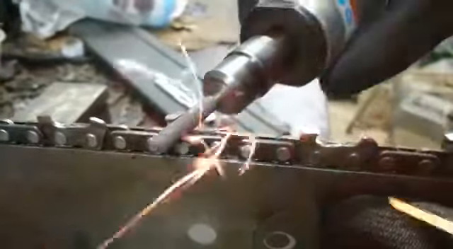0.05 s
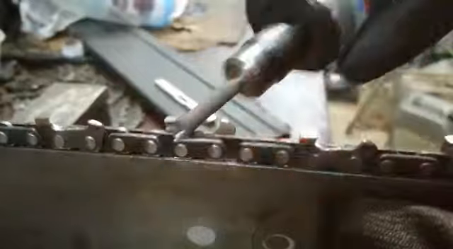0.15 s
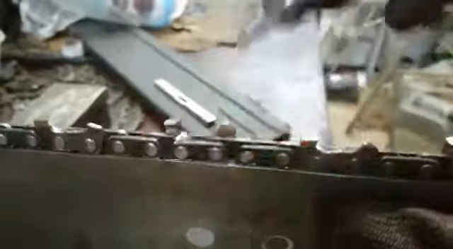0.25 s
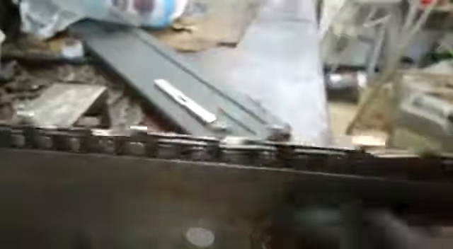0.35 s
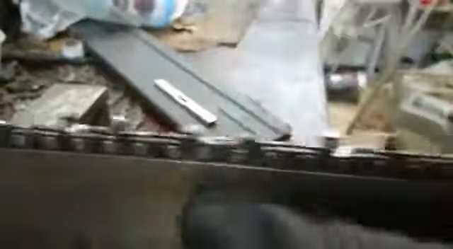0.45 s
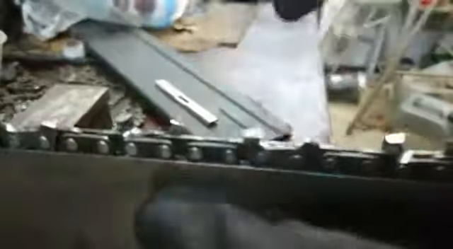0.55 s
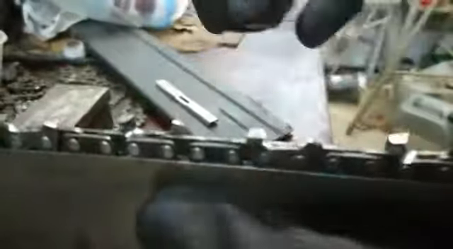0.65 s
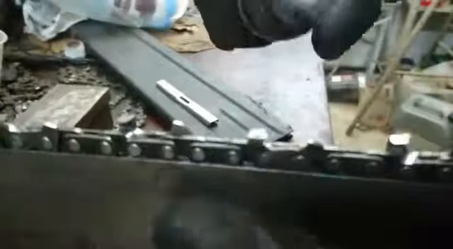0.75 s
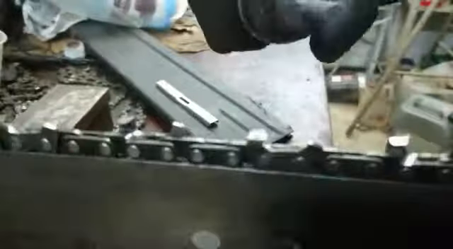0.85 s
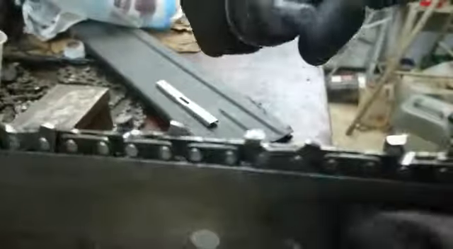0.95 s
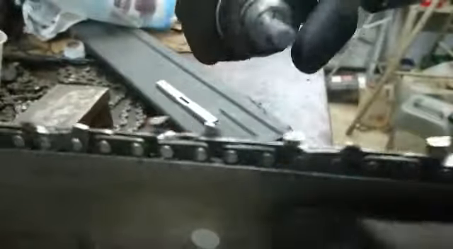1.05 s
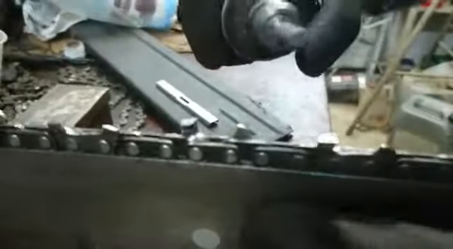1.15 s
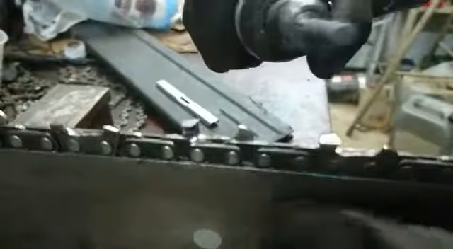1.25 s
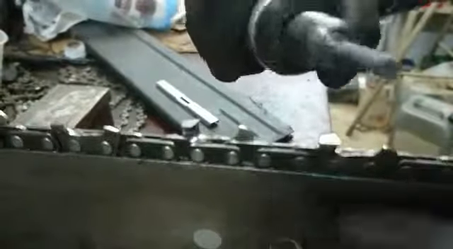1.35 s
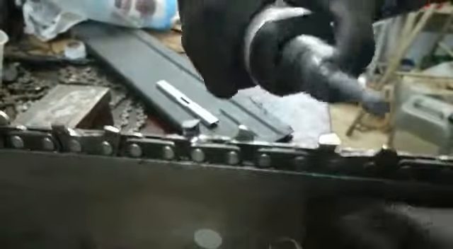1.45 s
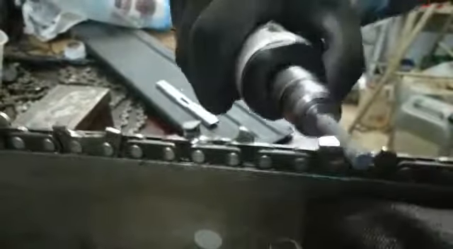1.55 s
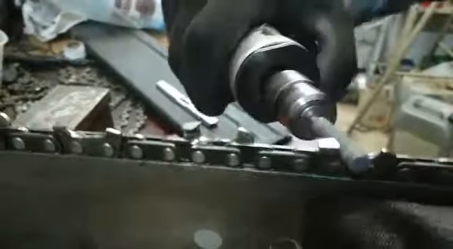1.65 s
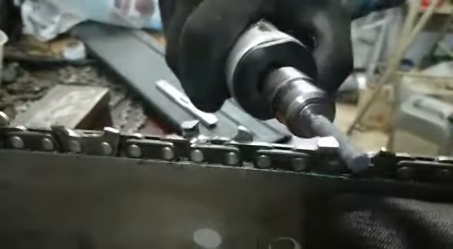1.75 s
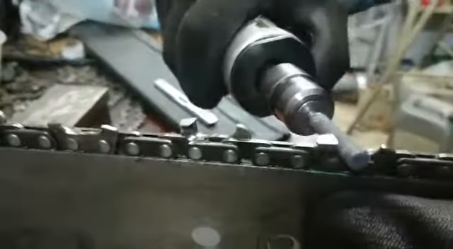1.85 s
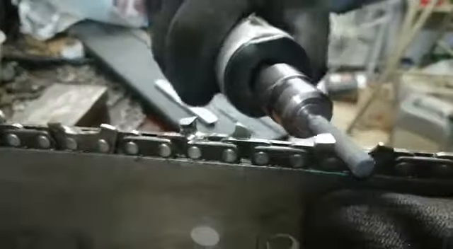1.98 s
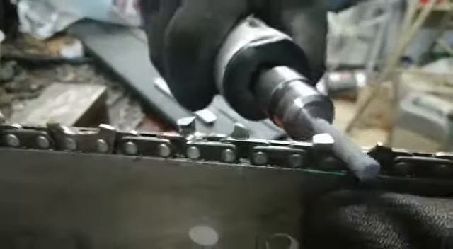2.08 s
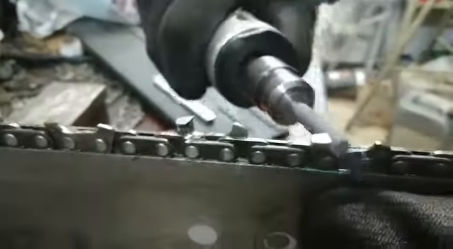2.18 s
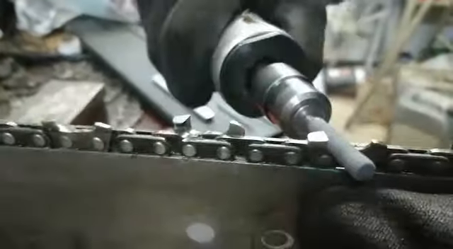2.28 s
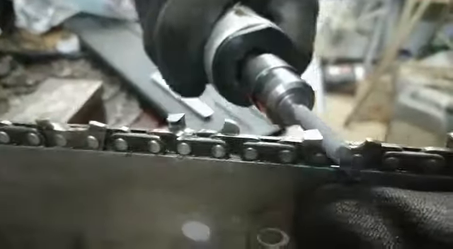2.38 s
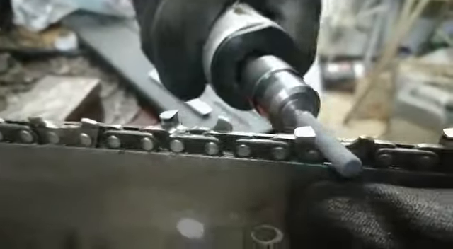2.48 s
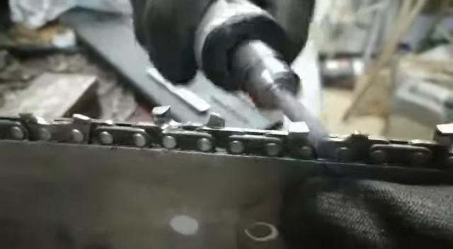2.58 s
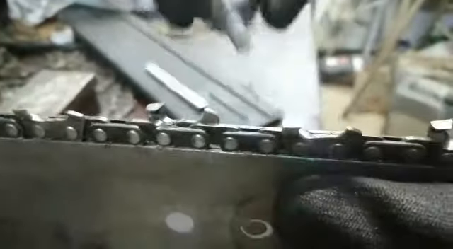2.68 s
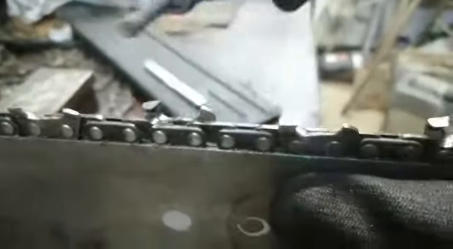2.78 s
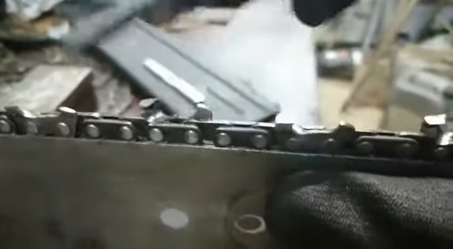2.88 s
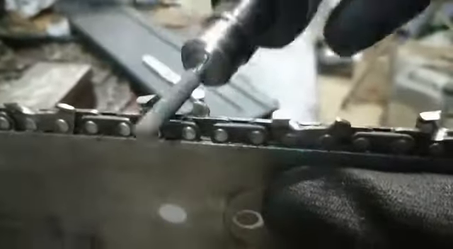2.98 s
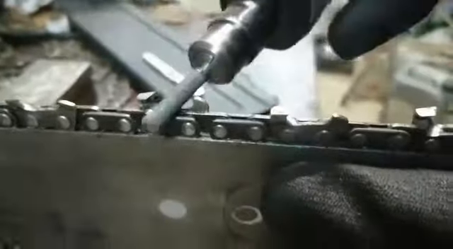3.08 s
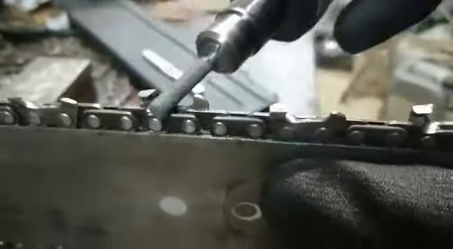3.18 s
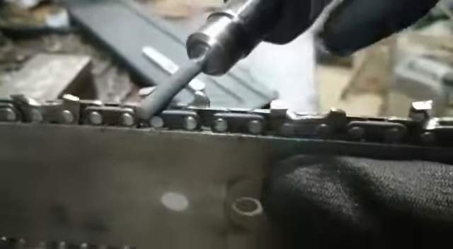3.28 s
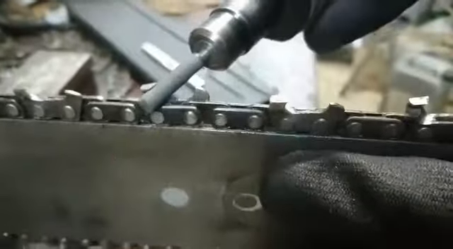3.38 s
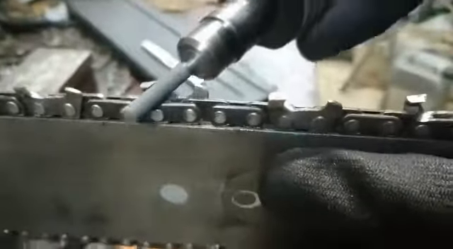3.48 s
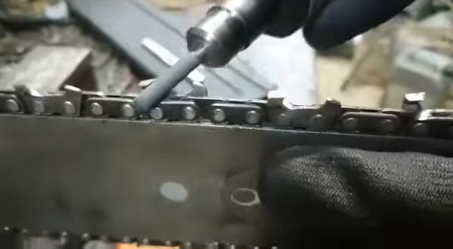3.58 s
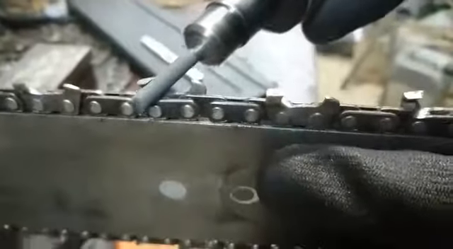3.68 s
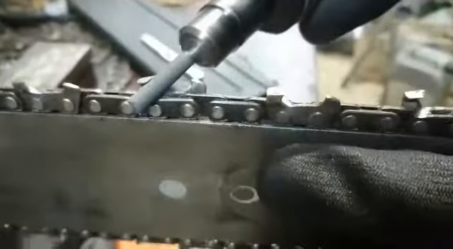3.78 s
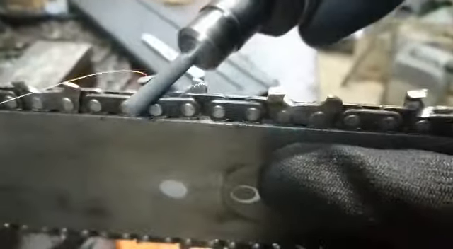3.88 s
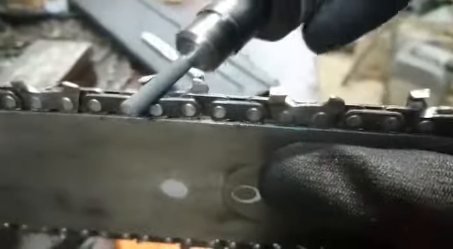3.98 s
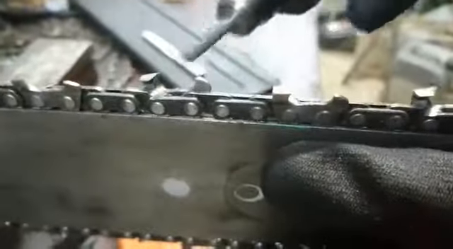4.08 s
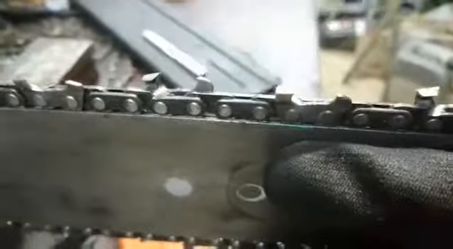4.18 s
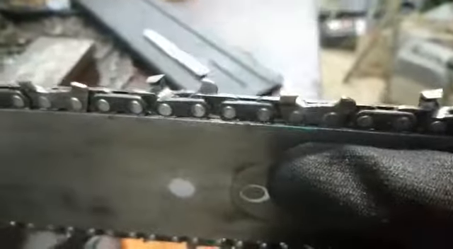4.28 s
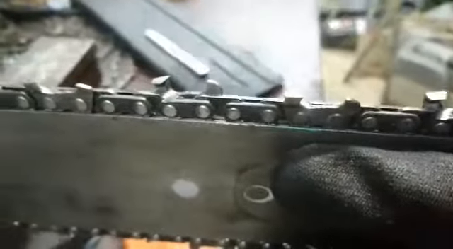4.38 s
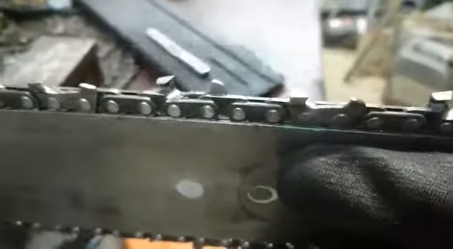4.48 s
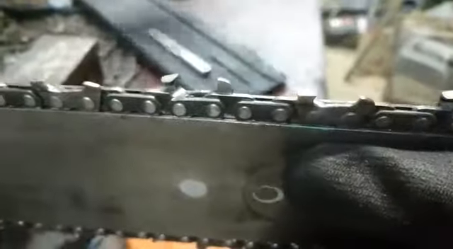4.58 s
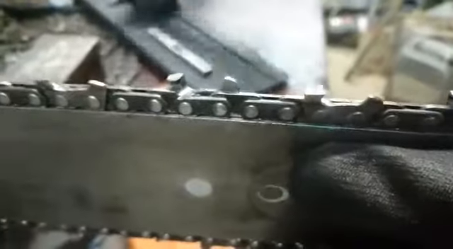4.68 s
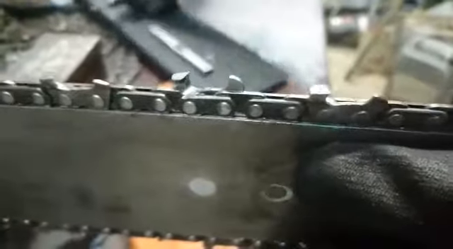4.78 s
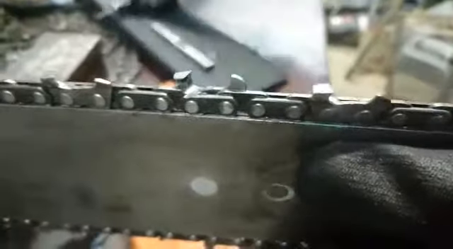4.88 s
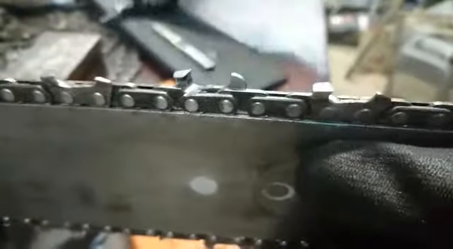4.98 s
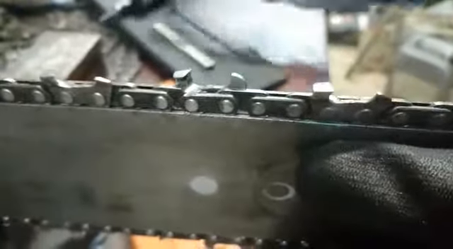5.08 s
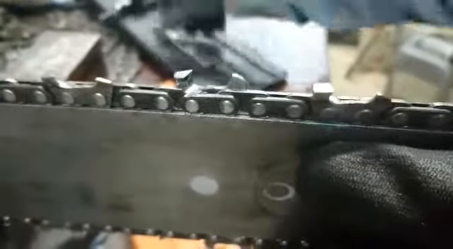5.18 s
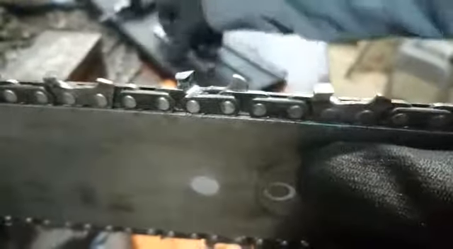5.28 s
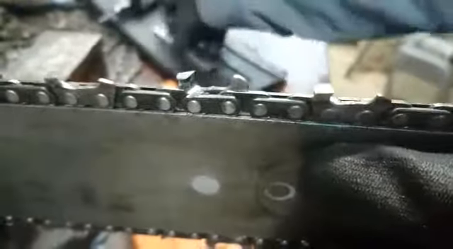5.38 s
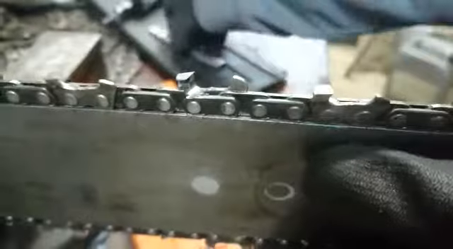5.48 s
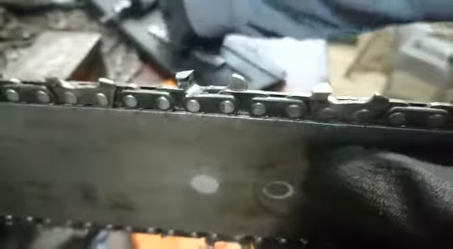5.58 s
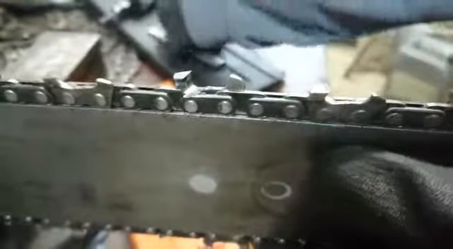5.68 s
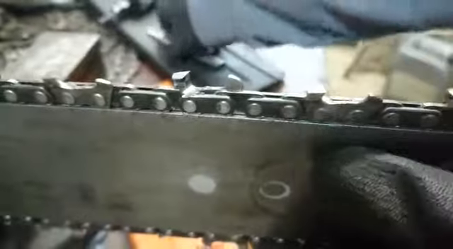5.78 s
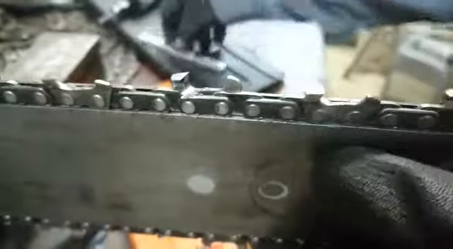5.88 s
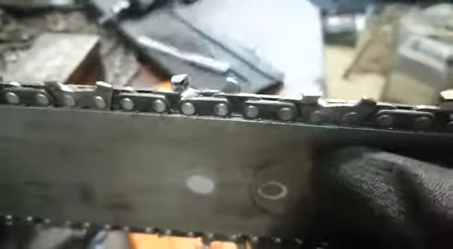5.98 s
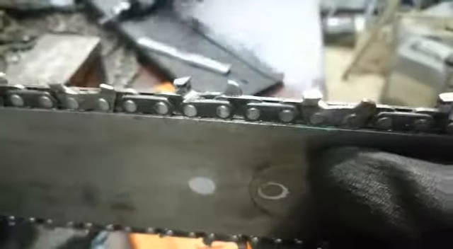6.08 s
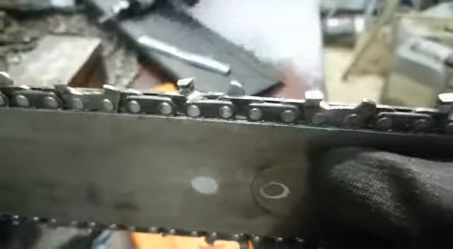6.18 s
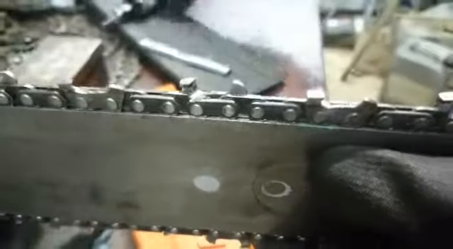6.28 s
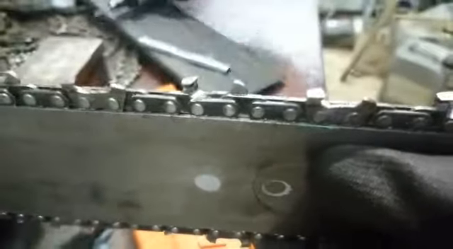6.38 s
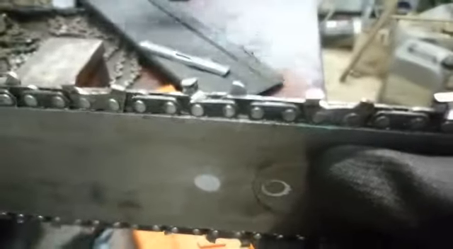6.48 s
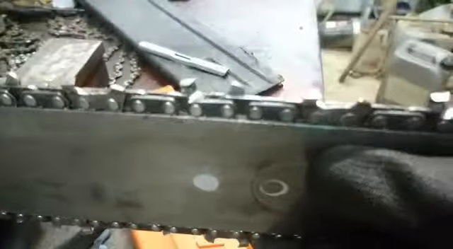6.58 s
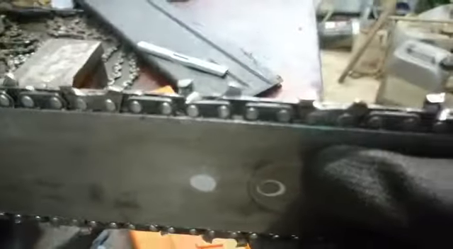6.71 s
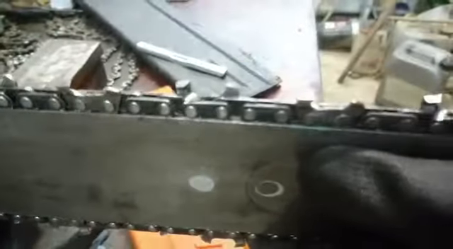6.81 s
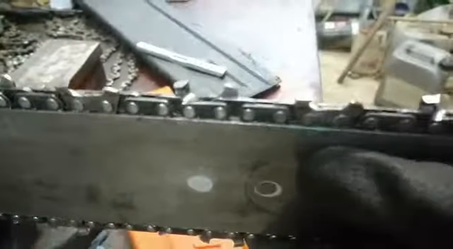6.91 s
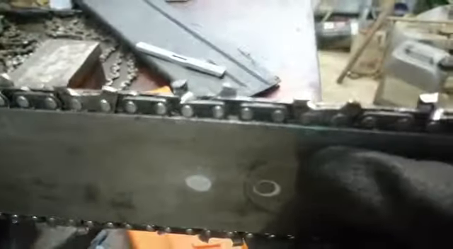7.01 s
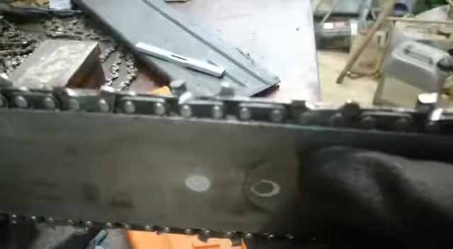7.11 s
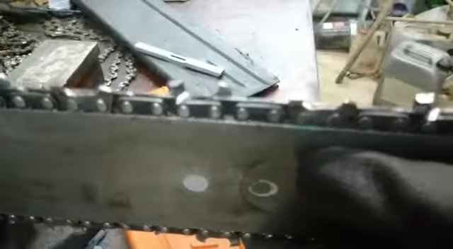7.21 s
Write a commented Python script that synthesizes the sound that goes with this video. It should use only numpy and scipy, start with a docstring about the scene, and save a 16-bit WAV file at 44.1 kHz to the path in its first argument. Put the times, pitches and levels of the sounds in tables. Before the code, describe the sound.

In a hard-walled workshop with low room tone and faint hum, a close air grinder is already running, a shrill whine near 4.4 kHz with harsh hiss and gritty grinding. It shuts at about 0.25 s, its pitch falling rapidly to silence. Chain glides softly along its bar around 0.35 and 0.95-1.5 s, with clicks near 1.3 and 1.6 s and a dull tool knock. At 1.9 s air pops, the rotor whoops up and whines, sagging slightly, until 2.7 s. Light chain clicks and a short slide follow at 3.1-3.3 s. A third, rougher grinding burst runs 3.3-4.1 s. The tool clacks down hollowly at 4.4 and 4.6 s; a tiny steel chink follows at 4.7 s. Woody knocks, dull drags and faint cloth rustle continue, then brighter steel scraping and clatter from 6.6 to 7 s. Exhaust air blows mostly against the left microphone.

```python
"""A vane-motor air grinder works on a saw chain clamped in a workshop vise; its first pull is already running.
It coasts to a stop, the chain slides and clicks along its bar, a tool knocks, and a second pull whoops up and whines.
The chain moves again before a third pull; then the tool is laid down, steel chinks, and things knock, drag and clatter.
The grinder sums harmonics of its turning rotor with shaped air noise that blows mostly across the left microphone port.
Bench and chain sounds are noise bursts and resonances; a diffuse room surrounds them over low room tone and hum."""
import sys
import numpy as np
from scipy import signal
from scipy.fft import rfft, irfft, next_fast_len
from scipy.io import wavfile
from scipy.ndimage import uniform_filter1d

SR = 44100
rng = np.random.default_rng(int(sys.argv[2]) if len(sys.argv) > 2 else 0)


def store_pcm(level_fs):
    """Save levels as 16-bit WAV."""
    pcm = np.round(np.clip(level_fs, -1, 1) * 32767).astype(np.int16)
    wavfile.write(sys.argv[1], SR, np.atleast_2d(pcm).T)


N = 319725
TIME = np.arange(N) / SR
CUTOFF_HZ = 16000


def from_db(db):
    """Decibels to gain."""
    return 10 ** (np.asarray(db) / 20)


def rms_one(x):
    """Scale to unit power."""
    return x / np.sqrt(np.mean(x ** 2) + 1e-20)


def at_hz(points, hz):
    """Read each column of a spectrum on a log-frequency axis."""
    known, *columns = np.transpose(points)
    log_hz = np.log(np.maximum(hz, 1))
    return np.array([np.interp(log_hz, np.log(known), column) for column in columns])


def drift(rate, size):
    """Random wandering with a spread near 1, through `rate` random points per second."""
    knots = rng.standard_normal(4096)
    return np.interp(np.arange(size) * rate / SR, np.arange(len(knots)), knots)


def coloured(x, spectrum):
    """Give stereo noise a spectrum; rms 1."""
    size = next_fast_len(N)
    bins_hz = np.arange(size // 2 + 1) * SR / size
    shaped = rfft(x, size) * from_db(at_hz(spectrum, bins_hz))
    return rms_one(irfft(shaped, size)[:, :N])


def noise(spectrum, grain_db=0):
    """Stereo noise, gritty when its grains differ in size."""
    grains = from_db(grain_db * np.minimum(rng.exponential(1, N), 6))
    return coloured(rng.standard_normal((2, N)) * grains, spectrum)


def band(x, low_hz, high_hz):
    """Causal band-pass."""
    sos = signal.butter(2, [low_hz, min(high_hz, SR / 2 - 100)], "band", fs=SR, output="sos")
    return signal.sosfilt(sos, x + 1e-18)


def resonate(x, hz, width_hz):
    """One two-pole resonance, with unit gain near its peak."""
    r = np.exp(-np.pi * width_hz / SR)
    peak = np.array([1, 0, -1]) * (1 - r * r) / 2
    return signal.lfilter(peak, [1, -2 * r * np.cos(2 * np.pi * hz / SR), r * r], x)


def resonances(modes, force, apart_hz=1800):
    """Noise of a given force shakes a body's modes; the two ports hear the low ones alike, the high ones apart."""
    shake, out = rng.standard_normal((3, len(force))) * force + 1e-18, 0
    for hz, db, width_hz in modes:
        apart = hz / apart_hz
        drive = (shake[0] + apart * shake[1:]) / np.hypot(1, apart)
        out = out + from_db(db) * resonate(drive, hz, width_hz)
    return band(out, modes[0][0] / 3, modes[-1][0] * .87)


def blow(rattle_t60, crack_db=7, crack_t60=0.014, crunch_db=4):
    """Force of one contact: a dry crack that trails into a crunchy rattle (t60 in s)."""
    t = TIME[:SR // 4]
    crack = from_db(crack_db - 60 * t / crack_t60)
    return crack + from_db(crunch_db * drift(300, len(t)) - 60 * t / rattle_t60)


def at_level(x, db):
    """Set the level of a hit by its first 20 ms."""
    return from_db(db) * x / np.std(x[:, :SR // 50])


def add(out, s, sound):
    """Mix a short sound in at a given time."""
    start = int(s * SR)
    out[:, start:start + sound.shape[-1]] += sound[..., :N - start]


# Air of the still workshop. Each row: frequency in Hz, relative density in dB per Hz.
SHOP_AIR = [(25, -22), (55, 1), (120, 4.5), (300, -5), (600, -6), (1200, -15), (3000, -21.5), (8000, -29),
            (15000, -38)]
# Steady hum lines. Each row: frequency in Hz, level in dB before the final left/right trim.
HUM_LINES = [(59.2, -64), (301.5, -68.5)]


def background(shop_db=-61, apart=0.26):
    """Low room tone, much alike at both ports, with a faint hum of steady sines."""
    shared = rng.standard_normal(N)
    air = coloured(shared + apart * rng.standard_normal((2, N)), SHOP_AIR)
    hum = sum(np.sqrt(2) * from_db(db) * np.sin(2 * np.pi * hz * TIME) for hz, db in HUM_LINES)
    return from_db(shop_db) * air + hum


# How long the room rings. Each row: frequency in Hz, decay time to -60 dB in s.
ROOM_DECAY = [(100, 1), (400, 0.55), (900, 0.55), (2200, 0.65), (4500, 0.71), (8000, 0.36), (14000, .33)]
# How strongly the room answers. Each row: frequency in Hz, relative level in dB for the band around it.
ROOM_STRENGTH = [(100, -10), (450, -7), (850, -1.5), (1250, -6), (1900, -2.5), (2600, -7.5), (3400, -5),
                 (4500, -17), (8000, -11), (14000, -17)]


def workshop(x, gap_s=0.002, build_s=0.018):
    """Diffuse echo of a hard-walled room: noise bands that build up, then die each at its own pace."""
    t, tail = TIME[:SR], 0
    edges = np.geomspace(70, 17000, 15)
    swell = np.clip((t - gap_s) / build_s, 0, 1)
    for low, high in zip(edges, edges[1:]):
        hz = np.sqrt(low * high)
        decay = swell * from_db(-60 * t / at_hz(ROOM_DECAY, hz))
        ring = band(rng.standard_normal((2, SR)), low, high) * decay / np.linalg.norm(decay)
        tail = tail + ring * from_db(at_hz(ROOM_STRENGTH, hz))
    mono = x.sum(axis=0, keepdims=True) / np.sqrt(2)
    return signal.fftconvolve(mono, tail, axes=1)[:, :N]


def wall_echo(x, delay_s=.0155, echo_db=-14):
    """A near wall throws the midrange back, doubling and blurring the glides."""
    back = band(x.mean(axis=0), 550, 2400)
    return from_db(echo_db) * np.interp(TIME - delay_s, TIME, back, left=0)


RUSTLE_FROM_S, RUSTLE_TO_S, RUSTLE_DB = 5.3, 6.7, -63.5   # gloves and sleeve move while the bench is tidied
# Cloth colour. Each row: frequency in Hz, relative density in dB per Hz.
CLOTH = [(300, 0), (900, 5.5), (2000, -0.5), (4500, 1.5), (7000, -9.5), (12500, -10.5), (16000, -10)]


def rustle(flutter_db=3.5):
    """Faint gritty cloth noise whose level wanders while the arm moves."""
    moving = np.clip(10 * np.minimum(TIME - RUSTLE_FROM_S, RUSTLE_TO_S - TIME), 0, 1)
    return moving * from_db(RUSTLE_DB + flutter_db * drift(14, N)) * noise(CLOTH, grain_db=3.0)


# Strongest resonances of the bench. Each row: frequency in Hz, relative level in dB, width in Hz.
BENCH_MODES = [(330, -3, 330), (650, -1, 130), (910, -1, 200), (1400, -13, 250), (1620, -10, 120)]
# Resonances of a dragged steel piece. Each row: frequency in Hz, relative level in dB, width in Hz.
STEEL_MODES = [(560, -8, 400), (950, -5, 260), (1280, 0, 380), (1750, -3.5, 600), (2300, -7, 500),
               (2750, -8, 250), (3750, -3, 280), (4550, -8, 650), (6400, -14, 1200)]
# Things dragged over the bench. Each row: start in seconds, length in seconds,
# dull rub in dB, bright scrape in dB (levels at full pressure, before the mix).
DRAG_MOVES = [(4.717, .11, -42, -66), (4.86, .22, -40, -74), (5.469, 0.087, -49, -62),
              (5.83, 0.19, -47.5, -54), (6.29, 0.08, -56, -55), (6.42, .12, -54, -70),
              (6.645, .38, -47, -39.5)]
DRAG_PEAK = 0.38   # share of a drag at which it presses hardest
GRAINS_PER_S, GRAIN_S = 220, .003   # small catches, and the time constant at which each dies


def drags(size_db=3.0, smooth=1.0, glint_db=-24):
    """Gritty sliding: small catches shake bench top and steel under a pressure that swells and eases off."""
    sizes = from_db(size_db * np.minimum(rng.exponential(1, N), 3))
    catches = (rng.random(N) < GRAINS_PER_S / SR) * sizes
    grit = smooth + signal.lfilter([1], [1, -np.exp(-1 / (GRAIN_S * SR))], catches + 1e-18)
    rub = rms_one(band(resonances(BENCH_MODES, grit), 70, 1100))
    scrape = rms_one(resonances(STEEL_MODES, grit))
    glint = rms_one(band(rng.standard_normal((2, N)) * grit, 11500, 14000))
    scrape = scrape + from_db(glint_db) * glint
    out = np.zeros((2, N))
    for s, length, rub_db, scrape_db in DRAG_MOVES:
        angle = np.interp(TIME, [s, s + DRAG_PEAK * length, s + length], [0, np.pi / 2, np.pi])
        out += np.sin(angle) * (from_db(rub_db) * rub + from_db(scrape_db) * scrape)
    return out


# Hard contacts of the dragged steel. Each row: start in seconds, level in dB before the mix.
CLATTER_HITS = [(6.608, -56), (6.6545, -42.5), (6.7185, -38), (6.7738, -35.5), (6.788, -39), (6.8268, -40),
                (6.8948, -40), (6.9637, -49)]


def clatter(rattle_t60=.05, hard_hz=1300):
    """Hard little contacts bring out the upper resonances of the dragged steel."""
    out = np.zeros((2, N))
    for s, db in CLATTER_HITS:
        force = blow(rattle_t60, crack_db=9, crack_t60=.009)
        add(out, s, at_level(band(resonances(STEEL_MODES, force), hard_hz, CUTOFF_HZ), db))
    return out


# Tools knocked on the bench. Each row: start in seconds, thud in dB, ringing body in dB, click in dB
# (levels before the mix), rattle decay to -60 dB in seconds.
BENCH_KNOCKS = [(1.603, -48, -58, -76, .15), (4.7328, -40, -40, -62, .13), (4.869, -40, -40, -76, .08),
                (4.9024, -42, -37, -53, .06), (4.938, -44, -42, -60, .06), (4.9982, -46, -38, -61, .06),
                (5.2377, -35, -35.5, -43, .18), (5.3922, -52, -41.5, -53, .06), (5.484, -49, -41, -57, .16),
                (5.8886, -54, -43, -58, .15), (6.4682, -54, -51, -72, .08)]


def knocks(thud_t60=0.09):
    """Each knock on the bench is a thud of its top, its woody resonances and a dry click."""
    out, t = np.zeros((2, N)), TIME[:SR // 4]
    for s, thud_db, body_db, click_db, rattle_t60 in BENCH_KNOCKS:
        force = blow(rattle_t60)
        thud = band(rng.standard_normal((1, len(t))) * from_db(-60 * t / thud_t60), 125, 300)
        click = band(band(rng.standard_normal((2, len(t))) * force, 1300, 4900), 800, 6200)
        body = at_level(resonances(BENCH_MODES, force), body_db)
        add(out, s, at_level(thud, thud_db) + body + at_level(click, click_db))
    return out


CHINK_S = 4.7006   # when a small steel part is touched


def chink(tick_db=-13, ping_db=0, ping_hz=12150, t60=0.009, bounce_s=.0042, bounce_db=-7):
    """Steel touches steel and bounces once: a sharp tick and a very brief high ping, both of noise."""
    out, t = np.zeros((2, N)), TIME[:SR // 20]
    for s, db in ((CHINK_S, 0), (CHINK_S + bounce_s, bounce_db)):
        tick, ping = rng.standard_normal((2, 2, len(t))) * from_db(db - 60 * t / t60)
        tick = from_db(tick_db) * band(tick, 2500, 15000)
        add(out, s, tick + from_db(ping_db) * band(ping, ping_hz - 600, ping_hz + 600))
    return out


# The grinder meets the bench. Each row: start in seconds, level in dB before the mix.
TOUCHDOWNS = [(4.3954, -32.5), (4.4185, -37), (4.572, -28.5)]
# Resonances of its casing on the bench. Each row: frequency in Hz, relative level in dB, width in Hz.
CASING_MODES = [(520, -1, 100), (960, 0, 170), (1300, -7, 380), (2000, -10, 500), (3550, -12, 400),
                (4300, -16, 800), (5900, -22, 600)]


def tool_down(rattle_t60=.2):
    """The grinder lands on the bench with a hollow clack, settles and lands again."""
    out = np.zeros((2, N))
    for s, db in TOUCHDOWNS:
        add(out, s, at_level(resonances(CASING_MODES, blow(rattle_t60)), db))
    return out


# Chain drawn along its bar. Each row: start in seconds, length in seconds, level in dB before wander and mix.
GLIDES = [(0.34, .25, -55.5), (0.948, .24, -55), (1.231, .07, -59), (1.397, 0.12, -55.5),
          (3.106, 0.078, -61)]
GLIDE_RAMP_S = .02
# Colour of links gliding on the bar. Each row: frequency in Hz, relative density in dB per Hz.
GLIDE_COLOUR = [(900, -13), (2000, 2), (4400, 0.5), (7000, -5), (12500, -5.5), (16000, -12.5)]
# Links click against the bar. Each row: start in seconds, first level in dB before the mix.
CLICKS = [(0.9478, -43), (1.3157, -34.5), (1.5616, -39.5), (1.5942, -39), (3.065, -48), (3.269, -45.5)]
# Colour of a clicking link. Each row: frequency in Hz, relative density in dB per Hz.
CLICK_COLOUR = [(300, -12), (1000, 0), (2000, 2), (4500, -2.5), (7000, -12), (15000, -22)]


def chain(catch_db=2.0, click_t60=.018):
    """The chain glides evenly along its bar as gritty noise, and now and then a link clicks home."""
    glide = sum(
        from_db(db) * np.clip(np.minimum(TIME - s, s + length - TIME) / GLIDE_RAMP_S + .5, 0, 1)
        for s, length, db in GLIDES)
    clicks = sum(
        from_db(db - 60 * np.clip((TIME - s) / click_t60, 0, 2)) * (TIME >= s)
        for s, db in CLICKS)
    gliding = glide * from_db(catch_db * drift(70, N)) * noise(GLIDE_COLOUR, grain_db=2.5)
    return gliding + clicks * noise(CLICK_COLOUR)


def valve(pop_db=-6, pop_hz=420, pop_t60=0.02):
    """One short pop of air, a dying sine, as the trigger opens."""
    out, t = np.zeros((2, N)), TIME[:SR // 20]
    for opens, *_ in TRIGGER_PULLS:
        if opens > 0:
            add(out, opens, from_db(pop_db - 60 * t / pop_t60) * np.sin(2 * np.pi * pop_hz * t))
    return out


VANES, FREE_SPEED = 4, 320   # vanes; unloaded turns per s
LEAK_S, LEAK_RISE_DB_PER_S = .023, 1100   # air seeps through before the valve pops
CATCH_S, CATCH_SHARE = .0095, .19   # the vanes catch this long after the pop, this far into the spin-up
LABOUR_DB = -6.5   # relative level of the vane beat of a rotor near standstill
SWELL_DB_PER_S = 4.0   # the whine grows through a pull
SURGE_DB, SURGE_PEAK_S, SURGE_S = 5.5, .04, .055   # rush of pressure stored in the hose: strength, peak, width
WHINE_SURGE_DB = 4   # what the whine gains from that rush
CLOSING_DB, SHUT_SPEED = 5, 250   # loss of level, and turns per s left, as the valve shuts
SHUT_WHINE_DB, SHUT_AIR_DB = -28, -1   # further drop once it is shut
COAST_S, COAST_FADE_DB_PER_S = .039, 420   # slowing time constant and fade of the coasting rotor
COAST_BEAT_DB = -10.3   # relative level of its beat as the coast begins
STOP_S = .062   # from shut valve to silence


def pull(row, pitch):
    """The rotor spins up, runs under load, slows as the valve closes and coasts; gives samples and motor controls."""
    opens, spin_up_s, let_go, shut, whine_db, beat_db, air_db = row[:7]
    span = np.flatnonzero((TIME > opens - LEAK_S) & (TIME < shut + STOP_S))
    t = TIME[span]
    running = t - opens - CATCH_S
    spin = np.sin(np.pi / 2 * np.clip(CATCH_SHARE + running / spin_up_s, .02, 1))
    closing = np.clip((t - let_go) / (shut - let_go), 0, 1)
    coasting = np.maximum(t - shut, 0)
    # the whine is harmonic VANES ** 2 of the turning
    speed = spin * np.interp(t, *np.transpose(pitch)) / VANES ** 2
    speed = (speed + closing * (SHUT_SPEED - speed)) * np.exp(-coasting / COAST_S)
    idle_db = -60 * np.clip(-running / .003, 0, 1)
    is_shut = np.clip(coasting / .003, 0, 1)
    last_fade = np.clip((STOP_S - coasting) / .02, .001, 1)
    fade_db = COAST_FADE_DB_PER_S * coasting - 20 * np.log10(last_fade)
    surge = np.exp(-((running - SURGE_PEAK_S) / SURGE_S) ** 2)
    pressure_db = -CLOSING_DB * closing - fade_db
    whine = whine_db + pressure_db + idle_db + WHINE_SURGE_DB * surge
    whine = whine + SWELL_DB_PER_S * running + SHUT_WHINE_DB * is_shut
    driven_beat = beat_db + (LABOUR_DB - beat_db) * (1 - spin ** 2)
    beat = (1 - is_shut) * driven_beat + is_shut * COAST_BEAT_DB + idle_db - fade_db
    seeping_db = LEAK_RISE_DB_PER_S * np.minimum(running, 0)
    air = air_db + SURGE_DB * surge + pressure_db + seeping_db + SHUT_AIR_DB * is_shut
    return span, speed, whine, beat, air


# Exhaust colour for the overtones of the vane beat.
# Each row: frequency in Hz, left in dB, right in dB, against the whine level.
EXHAUST_COLOUR = [(1000, -16, -28.5), (2200, -28, -29), (2420, -18, -29), (3290, -22, -26),
                  (3620, -10, -25), (4400, -14, -27), (5500, -20, -29), (6050, -18, -29), (6650, -30, -29),
                  (7250, -24, -27), (7750, -31, -31), (9000, -16, -34), (10900, -42, -45),
                  (13200, -7.5, -24), (14500, -26, -28.5)]
# The whine itself, fourth harmonic of the vane beat.
# Each row: frequency in Hz, left in dB, right in dB, against the whine level.
WHINE_COLOUR = [(3000, -22, -28), (3800, 1, -22), (4400, -7.8, -29), (4850, -11.5, -27)]
# Once-a-turn lines from unequal vanes.
# Each row: frequency in Hz, left in dB, right in dB, against the air level at free speed.
WOBBLE_COLOUR = [(273, -8, -11), (550, -7.5, -9), (830, -9.5, -19), (1400, -11, -19), (2900, -18, -28),
                 (4000, -8, -24.5), (5000, -9, -24), (5560, -20, -21), (10500, -21, -27), (13400, -8, -15),
                 (15000, -22, -20)]
# Muffler colour for the overtones of slow puffs. Each row: frequency in Hz, level in dB against the vane beat.
RASP_COLOUR = [(450, -7), (900, 4), (1400, -12), (1900, -10.5), (2700, -27), (4400, -28), (9000, -43)]
# The puffs reach the left port first. Each row: frequency in Hz, lag of the right port in radians.
RIGHT_PORT_LAG = [(300, .4), (800, 1.1), (1100, 2.1), (1800, .7), (3400, .9), (4500, 1.4)]
RACING_TOP_DB = -6   # the top overtones weaken when the rotor races unloaded


def motor(speed, whine_db, beat_db, air_db, top_db, between_db=-12, jitter=.0016, chatter=.045,
          waver_db=3.0, beat_waver_db=2.0, count=56):
    """Every vane puffs: a strong beat with overtones, and weaker lines at each multiple of the rotor speed."""
    size, whine_order = len(speed), VANES ** 2
    slowness = np.clip(4 * (.9 - speed / FREE_SPEED), 0, 1)
    # at low speed the vanes chatter in their slots and the turning is uneven
    unevenness = 1 + jitter * drift(250, size) + chatter * slowness * drift(500, size)
    turn = 2 * np.pi * np.cumsum(speed * unevenness) / SR
    top_db = top_db + RACING_TOP_DB * np.clip((speed - 285) / 12, 0, 1)
    out = np.zeros((2, size))
    for order in range(1, count):
        hz = order * speed
        waver = from_db(waver_db * drift(25, size))
        is_top = order >= 2 * whine_order
        # slow puffs stand apart and rasp; fast ones whine
        rasp = slowness * from_db(beat_db + at_hz(RASP_COLOUR, hz))
        if order == VANES:
            gain = from_db(beat_db + beat_waver_db * drift(25, size))
        elif order == whine_order:
            gain = from_db(whine_db + at_hz(WHINE_COLOUR, hz)) + rasp
        elif order % VANES == 0:
            # at the top, the overtones of the whine get their own trim, their neighbours another
            trim_db = is_top * (between_db if order % whine_order else top_db)
            gain = (from_db(whine_db + at_hz(EXHAUST_COLOUR, hz) + trim_db) + rasp) * waver
        else:
            line = from_db(air_db + at_hz(WOBBLE_COLOUR, hz) + is_top * top_db)
            gain = line * waver * speed / FREE_SPEED
        # each once-a-turn line starts at a random phase, so they do not pile up into pulses
        offset = rng.uniform(0, 2 * np.pi) * (order % VANES > 0)
        lag = at_hz(RIGHT_PORT_LAG, hz) * np.array([[0], [1]])
        out += np.sqrt(2) * gain * (hz < CUTOFF_HZ) * np.sin(order * turn + offset - lag)
    return out


# Trigger pulls. Each row: valve opens in seconds, spin-up in seconds, trigger let go in seconds,
# valve shut in seconds, then relative levels in dB: whine, vane beat, air, top overtones,
# draught against air, steady grinding noise of the stone on the tooth against air.
TRIGGER_PULLS = [(-0.55, .09, .232, .2465, -11.5, -25.5, -25, -1, -3, -6),
                 (1.9246, .099, 2.664, 2.680, -12.5, -20, -27, -9, 2.3, -30),
                 (3.3262, .077, 4.061, 4.095, -13, -26.5, -27, 0, -1.3, -5.5)]
# Whine pitch, one list per pull, before spin-up and closing bend it; it sags as the stone bites into the tooth.
# Each row: time in seconds, frequency in Hz.
PITCH_CURVES = [
    [(0.0, 4379), (0.008, 4433), (0.13, 4380), (0.23, 4597)],
    [(2.02, 4810), (2.048, 4788), (2.246, 4442), (2.284, 4475), (2.354, 4390), (2.466, 4429), (2.572, 4383),
     (2.665, 4596)],
    [(3.41, 4845), (3.432, 4853), (3.564, 4590), (3.646, 4497), (3.68, 4369), (3.978, 4389), (4.046, 4565),
     (4.06, 4536)],
]
# Exhaust hiss. Each row: frequency in Hz, left and right relative density in dB per Hz.
HISS_COLOUR = [(100, -5.5, -16), (900, -4, -10), (1600, 2, -7), (2960, 2.5, -9), (4070, 0, -10),
               (5370, 2.5, -4), (7800, 0, 0), (8900, 3.5, 1), (10700, -6, -3), (13000, 10, 8.5),
               (16700, -2, -1)]
# Exhaust draught on the ports. Each row: frequency in Hz, left and right relative density in dB per Hz.
DRAUGHT_COLOUR = [(25, -44, -49), (63, 3, -25), (134, 4, -26), (390, -4.5, -19.5), (935, -12, -20),
                  (2500, -44.5, -48.5)]
# Rough noise, for air blowing past vanes that have not yet sealed and for the stone grinding the tooth.
# Each row: frequency in Hz, relative density in dB per Hz.
ROUGH_COLOUR = [(80, -8), (200, 0), (450, 3), (850, 1.5), (1500, -4), (2200, -6), (3000, -12), (4400, -1),
                (6500, -9), (9000, -11), (15000, -16)]


def grinder(hiss_db=4.5, blow_by_db=9.5, lump_db=2.5, flutter_db=1.7):
    """Motor, exhaust air and grinding stone as heard in the room, and the draught that only the ports feel."""
    sound, wind = np.zeros((2, 2, N))
    hiss, draught, rough = noise(HISS_COLOUR), noise(DRAUGHT_COLOUR), noise(ROUGH_COLOUR)
    for row, pitch in zip(TRIGGER_PULLS, PITCH_CURVES):
        span, speed, whine_db, beat_db, air_db = pull(row, pitch)
        *_, top_db, draught_db, grinding_db = row
        # until the vanes are flung out against the casing, air leaks past them
        leak = np.clip(1.4 * (.95 - np.maximum.accumulate(speed) / FREE_SPEED), 0, 1)
        blow_by = from_db(blow_by_db) * leak * rough[:, span]
        grinding = from_db(grinding_db) * rough[:, span]
        exhaust = from_db(hiss_db + flutter_db * drift(80, len(span))) * hiss[:, span]
        noises = from_db(air_db) * (exhaust + blow_by + grinding)
        sound[:, span] += motor(speed, whine_db, beat_db, air_db, top_db) + noises
        lumps_db = lump_db * drift(110, len(span))
        wind[:, span] += from_db(air_db + draught_db + lumps_db) * draught[:, span]
    return sound, wind


def scene(close_db=7.5, grinder_room_db=-8.0, bench_room_db=1.5, chain_room_db=-5, chink_room_db=1, left_db=1.0):
    """The grinder is close and loud; the bench sounds lie deeper in the room, a little to the left."""
    tool, wind = grinder()
    tool, wind = from_db(close_db) * (tool + valve()), from_db(close_db) * wind
    bench = knocks() + tool_down() + clatter() + drags()
    links, ping = chain() + rustle(), chink()
    room_feed = from_db(grinder_room_db) * tool + from_db(bench_room_db) * bench
    room_feed = room_feed + from_db(chain_room_db) * links + from_db(chink_room_db) * ping
    room = workshop(room_feed)
    to_left = from_db([[left_db], [-left_db]])
    return tool + wall_echo(tool) + wind + room + to_left * (bench + links + ping + background())


def left_port(x, port_hz=4500, width_hz=600, boost=2.77):
    """The cavity behind the left port resonates."""
    return np.array([x[0] + boost * resonate(x[0], port_hz, width_hz), x[1]])


def gain_control(x, threshold_db=-21, most_db=9.0, release_db_per_s=130, attack_s=.0015):
    """Loud sound turns the gain down, by up to most_db below the limiter; it then recovers at a steady rate."""
    power = uniform_filter1d(np.max(x ** 2, axis=0), 256)
    level_db = 10 * np.log10(np.maximum(power, 1e-12))
    cut_db = np.clip(level_db - threshold_db, 0, most_db)
    cut_db = np.maximum(cut_db, level_db + 7.0)   # a limiter catches the loudest swells
    release_db = release_db_per_s * TIME
    held_db = np.maximum.accumulate(cut_db + release_db) - release_db
    r = np.exp(-1 / (attack_s * SR))
    smooth_db, _ = signal.lfilter([1 - r], [1, -r], held_db, zi=[r * held_db[0]])
    return x * from_db(-smooth_db)


def record(dry):
    """Port colour, gain control, clipping of peaks and the top cut."""
    x = np.clip(gain_control(left_port(dry)), -.93, .93)
    return signal.sosfilt(signal.ellip(12, .1, 80, CUTOFF_HZ, fs=SR, output="sos"), x)


dry = scene()
out = record(dry)
store_pcm(out)
```